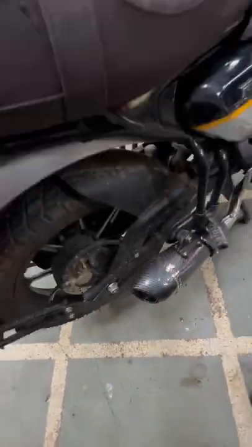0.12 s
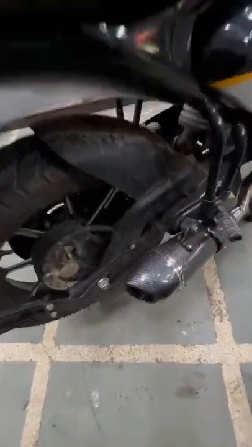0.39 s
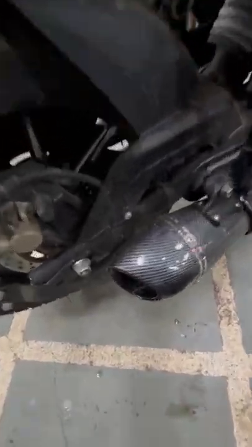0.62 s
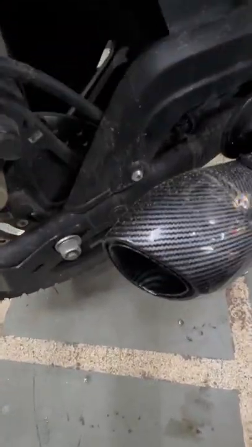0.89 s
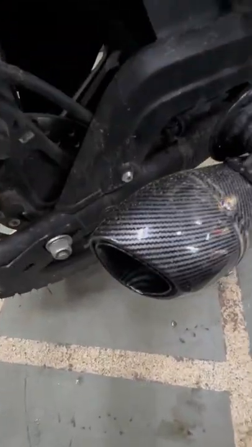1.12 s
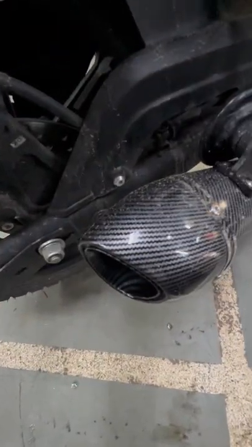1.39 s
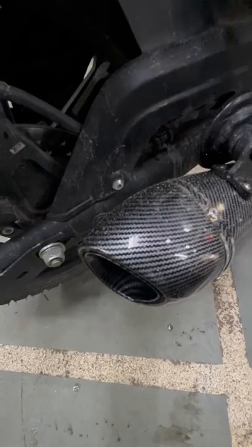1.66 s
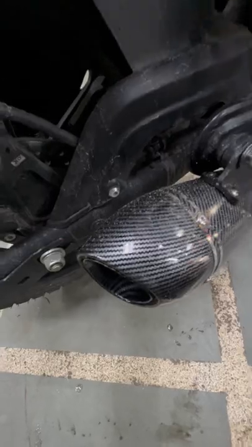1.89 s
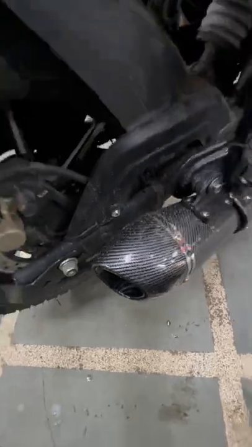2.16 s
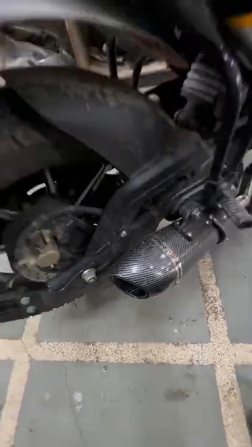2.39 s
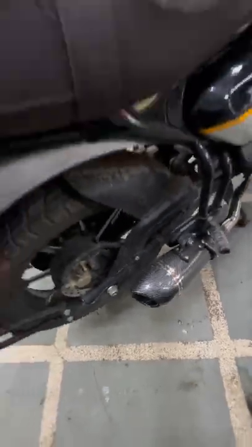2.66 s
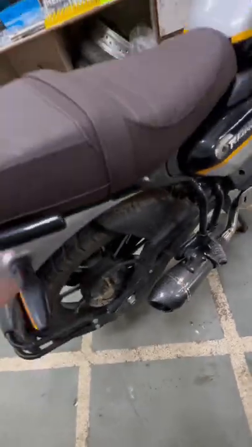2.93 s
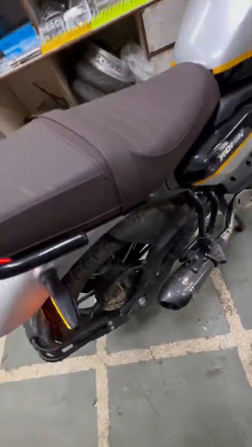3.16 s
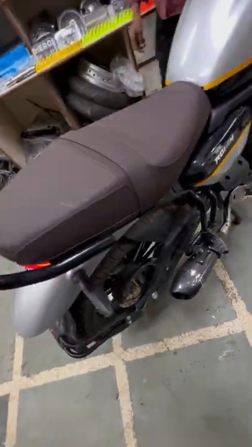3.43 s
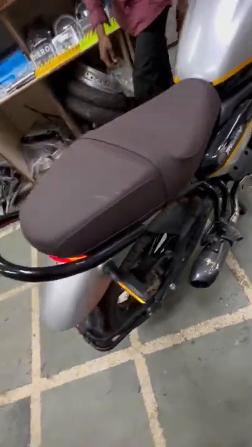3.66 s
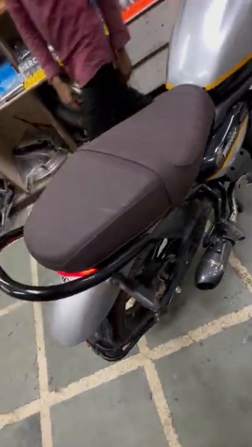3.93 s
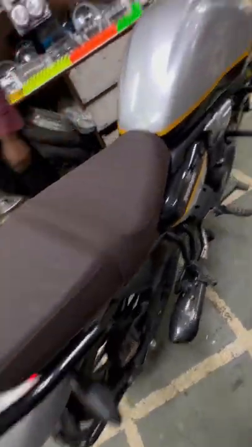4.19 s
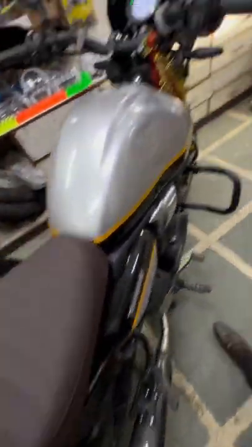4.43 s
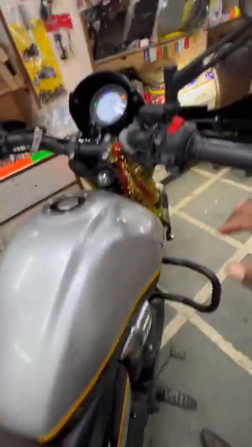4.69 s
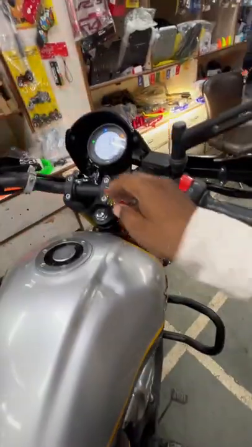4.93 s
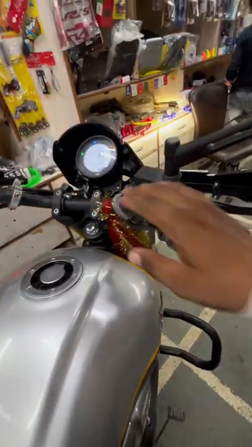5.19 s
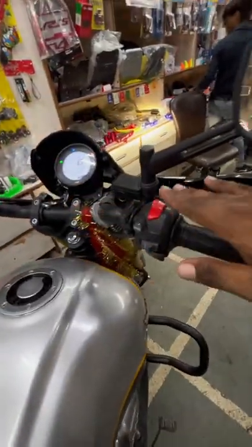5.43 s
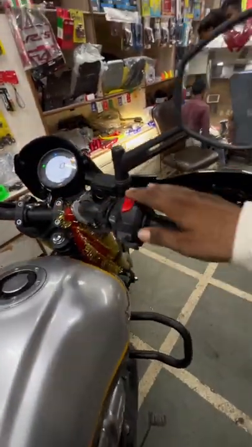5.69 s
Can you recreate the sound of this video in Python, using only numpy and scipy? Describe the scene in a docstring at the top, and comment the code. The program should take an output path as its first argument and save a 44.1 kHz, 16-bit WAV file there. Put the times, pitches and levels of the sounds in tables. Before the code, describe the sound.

A single-cylinder motorcycle is revved in a workshop, harsh barks and spits up close at the tailpipe, then settling to a soft, distant idle.

```python
"""Motorcycle blipped in a workshop

A single-cylinder motorcycle idles and is blipped; the microphone moves to the tailpipe and away.
Each firing spits a jet of gas and rings the exhaust: a thump that swells slowest, a boom and a bark.
Fuelled firings add a knock and a crack, made as a short low ring and a short burst of noise.
Rattle and valve clatter are shaped noise; the walls return the exhaust through sparse random taps."""
import sys
import numpy as np
from scipy import signal
from scipy.fft import rfft, irfft
from scipy.io import wavfile
from scipy.ndimage import uniform_filter1d

SR = 44100
rng = np.random.default_rng(int(sys.argv[2]) if len(sys.argv) > 2 else 0)


def store_pcm(level_fs):
    """Save levels as 16-bit WAV."""
    pcm = np.round(np.clip(level_fs, -1, 1) * 32767).astype(np.int16)
    wavfile.write(sys.argv[1], SR, np.atleast_2d(pcm).T)


def convert_level_to_amplitude(level_db):
    """Map a level in decibels to its linear amplitude factor."""
    exponent = np.asarray(level_db, float) / 20
    return 10 ** exponent


N = 256662

# engine speed: [t/s, firings per second]
SPEED = [(0.0, 48.79), (1.08, 15.43), (1.21, 22.44), (1.4, 19.71), (1.58, 25.58), (1.81, 18.6),
         (1.89, 20.4), (2.0, 16.31), (2.29, 26.48), (2.37, 20.91), (2.69, 22.84), (2.79, 18.38),
         (3.09, 34.11), (3.49, 25.35), (3.77, 16.8), (3.94, 27.63), (4.22, 38.2), (4.42, 40.0), (4.7, 30.3),
         (5.22, 15.3), (5.82, 15.46)]
# what each place in the shop does to the sound: [t/s, ring length as a factor on t60, wall return/dB,
# tilt of the bark modes/dB per octave from 300 Hz, extra top of the jet/dB, valve tick/dB,
# knock over the bark/dB, softness as a factor on the rise of bark and spit]
PLACE = [(0, 0.36, -74, 17.5, -14, -74, -5.5, 1.4), (.5, 0.48, -19.5, 10.5, 5, -54, 17, 1.5),
         (1.2, 1.33, -19.5, 6.5, 8, -50.5, 7.5, 1.17), (1.8, 1.35, -17.5, 2, -1, -55.5, 1, 0.89),
         (2.6, 1.42, -74, 3, 9.5, -60.5, 1.5, 0.94), (3.7, 1.28, -11, 4.5, 15, -66, -4, 1.4),
         (4.2, 0.53, -8.5, 5, 6, -59, -2.5, 1), (4.8, 1.62, -23, 0, -27, -63, -20, 4.5),
         (5.8, 2.8, -22, -18, -22, -89, -3, 4.4)]
# slow low mode of the exhaust with cool gas, at 22 firings a second: [f/Hz, level/dB, t60/s, rise/ms]
THUMP = [(87.44, 0, 0.13, 8.1)]
# throttle blips: [opens/s, shuts/s, boom gain/dB, bark gain/dB, jet gain/dB]
BLIPS = [(1.14, 1.173, 2.5, 4, 18.5), (1.42, 1.532, 2, 0.5, 19), (1.88, 1.897, 8, 10, 22.5),
         (1.99, 2.09, 2, 0, 5), (2.09, 2.207, 5, 8, 21.5), (2.5, 2.557, 9.5, 9.5, 12.5),
         (2.82, 3.162, 0, 9, 12.5), (3.77, 4.367, 2, 10.5, 18.5)]


def evened(x):
    """Scales to an average strength (rms) of 1."""
    return x / np.sqrt(np.mean(x ** 2) + 1e-20)


def read(points, hz):
    """Reads a spectrum on a log-frequency axis."""
    f, value = np.transpose(points)
    return np.interp(np.log(hz + 1), np.log(f + 1), value)


def curve(rows, t):
    """Reads every column of a curve at times t."""
    s, *columns = np.transpose(rows)
    return np.array([np.interp(t, s, c) for c in columns])


def add(mix, s, sound):
    """Mixes a sound in at s seconds."""
    part = mix[..., int(s * SR):][..., :sound.shape[-1]]
    part += sound[..., :part.shape[-1]]


def noise(colour, likeness):
    """Two channels of coloured noise, partly alike: the right one mixes the left with a separate noise."""
    hz = np.fft.rfftfreq(N, 1 / SR)
    left, other = rfft(rng.standard_normal((2, N)))
    same = np.clip(read(likeness, hz), -1, 1)
    pair = np.array([left, same * left + np.sqrt(1 - same ** 2) * other])
    return evened(irfft(pair * convert_level_to_amplitude(read(colour, hz)), N))


def firing_times():
    """The engine fires at every whole number of the summed speed."""
    t = np.arange(N) / SR
    turns = np.cumsum(curve(SPEED, t)[0]) / SR
    return np.interp(np.arange(int(turns[-1]) + 1), turns, t)


def throttle(times):
    """1 while the throttle is open, fading as the gas cools after it shuts."""
    opens, shuts = np.transpose(BLIPS)[:2, :, None]
    fade = np.exp(-np.maximum(times - shuts, 0) / 0.076)
    return ((times > opens) * fade).max(0)


def octaves(t):
    """Engine speed in doublings over 22 firings a second."""
    return np.log2(curve(SPEED, t)[0] / 22)


def levels(times):
    """Thump, boom, bark and jet dB of every firing, from place, speed, throttle and odd pops or stumbles."""
    # ring of an unfuelled stroke at 22 firings a second, as the microphone moves:
    # [t/s, thump/dB, boom/dB, bark/dB]
    stroke_levels = [(0, -22, -18.5, -30.5), (.15, -26.5, -21, -30), (.42, -21, -18, -31.5),
                     (.71, -11.5, -14.5, -26), (1.0, -11, -16.5, -25), (1.3, -12.5, -19.5, -25.5),
                     (1.6, -12.5, -18.5, -21.5), (1.85, -16, -21.5, -32), (2.2, -16, -22, -26.5),
                     (2.45, -23, -26.5, -34), (3.2, -30.5, -24.5, -34.5), (3.65, -26.5, -27.5, -37.5),
                     (4.06, -30.5, -26, -38.5), (4.42, -29.5, -25, -39), (4.9, -30, -31.5, -37.5),
                     (5.2, -34, -37.5, -40.5), (5.35, -37.5, -30, -35.5), (5.6, -33.5, -24, -29.5)]
    # faster strokes ring louder, dB per doubling of speed: [thump, boom, bark]
    speed_gains = [8, 6.5, 5.5]
    # single firings that pop or stumble: [t/s, ring gain/dB, jet gain/dB]
    odd_firings = [(.084, -54, -29), (.715, -2.5, 6.5), (1.155, -1, 8.5), (1.201, 4, 15), (1.44, 7, -4.5),
                   (1.486, 5.5, -1), (1.57, -11, -3.5), (2.464, -15, -33), (2.51, 2, 15.5), (2.556, 5.5, 7),
                   (3.151, -33, -26), (3.785, 1, 11), (3.837, -1, 10), (4.356, -5.5, -20),
                   (5.271, -12, -17), (5.726, -6, 4)]

    thump, boom, bark = curve(stroke_levels, times) + np.outer(speed_gains, octaves(times))
    opens, shuts, *gains = np.transpose(BLIPS)
    is_open = (times > opens[:, None]) & (times <= shuts[:, None])
    boom_up, bark_up, jet_up = gains @ is_open
    at, *gains = np.transpose(odd_firings)
    ring_odd, jet_odd = gains @ (abs(times - at[:, None]) < .008)

    # before blips and odd firings, the jet is at -45 dB for a bark of -30 dB and grows more steeply
    spit = -45 + 1.497 * (bark + 30) + jet_up + jet_odd
    thump = thump + 0.33 * boom_up  # the thump takes a third of a boom gain
    return thump, boom + boom_up + ring_odd / 2, bark + bark_up + ring_odd, spit


def ports(s, share):
    """Left and right gain of one firing; a few are heard strong on the left and hollow on the right."""
    # lopsided firings: [t/s, left-right difference as a share of the bark]
    lopsided = [(1.154, 0.34), (1.202, 0.59), (2.161, 1.3), (2.205, 1.45)]
    side = share * sum(v for at, v in lopsided if abs(at - s) < .015)
    return np.array([[1 + side], [1 - side]])


def ring(modes, tune, length, tilt_db, chance, glide, glide_ms, soft=1):
    """Modes swell and die; the hot front travels faster, so pitch starts high and sags."""
    upper_limit = 0.66  # modes above the first ring no longer than this factor on t60
    t = np.arange(SR // 4) / SR
    warped = t + glide * glide_ms / 1000 * (1 - np.exp(-1000 * t / glide_ms))
    total, sound = 0, 0
    for k, (hz, db, t60, rise_ms) in enumerate(modes):
        level_db = db + tilt_db * abs(np.log2(hz / 300))
        mode_length = min(length, upper_limit) if k else length
        decay = convert_level_to_amplitude(level_db - 60 * t / (t60 * mode_length))
        swell = (1 - np.exp(-1000 * t / (rise_ms * soft))) ** 2 * decay
        total = total + swell ** 2 / 2
        # only the first mode is retuned; each firing also strays a little in pitch and level
        pitch = hz * (1 if k else tune) * (1 + .012 * chance[k, 0])
        wave = swell * np.sin(2 * np.pi * pitch * warped)
        sound = sound + (-1) ** k * convert_level_to_amplitude(2 * chance[k, 1]) * wave
    return sound / np.sqrt(total[:SR // 50].mean())  # evened over the first 20 ms


def exhaust(times):
    """Firings ring pipe and can: hot gas raises the lowest modes, shortens all; a shut throttle dulls them."""
    # exhaust modes with cool gas, for the can, the pipe, and a short low knock that only a fuelled
    # firing gives: [f/Hz, level/dB, t60/s, rise/ms]
    boom_modes = [(161.2, 0, 0.14, 2.2)]
    bark_modes = [(281, 21, 0.091, 0.8), (470.4, -0.5, 0.15, 0.47), (586.6, 1, 0.13, 1.42),
                  (858.6, -3, 0.091, 1.45), (1240, -9.5, 0.051, 0.8), (1569, -18.5, 0.043, 1.5),
                  (2090, -36.5, 0.094, 0.4)]
    punch_modes = [(197, 0, 0.038, 2.6)]
    boom_heat = 0.53  # the big can warms less than the pipe: power on the pitch rise
    flutter_db = 2.9  # rms up to 22 firings a second

    out = np.zeros((2, N))
    chance = rng.standard_normal((len(times), 3, len(bark_modes), 2))
    ring_levels = levels(times)[:3]
    place = curve(PLACE, times)[[0, 2, 5, 6]]
    columns = *ring_levels, *place, *curve(SPEED, times), throttle(times)
    for (s, thump_db, boom_db, bark_db, length, tilt_db, punch_db, soft,
         speed, gas, luck) in zip(times, *columns, chance):
        luck = luck * min(.9, (18 / speed) ** 1.5)  # fast firings are more alike
        stroke = (speed / 22) ** 0.34  # a faster exhaust stroke pushes a shorter thump
        heat = 1 + 0.11 * gas
        length = length * (1 - 0.47 * gas)

        thump = ring(THUMP, stroke, length, 0, luck[0], glide=0.25, glide_ms=8.4)
        boom = ring(boom_modes, heat ** boom_heat, length, 0, luck[1], glide=1.0, glide_ms=0.79)
        low = convert_level_to_amplitude(thump_db) * thump + convert_level_to_amplitude(boom_db) * boom
        add(out, s + 0.00028, ports(s, 0.46) * low)

        dulled_db = tilt_db - 7 * (1 - gas)
        bark = -ring(bark_modes, heat, length, dulled_db, luck[2], glide=0.89, glide_ms=1.49, soft=soft)
        punch = ring(punch_modes, 0.96, 1, 0, luck[1], glide=1.16, glide_ms=3.49)
        add(out, s + 0.0019, gas ** 2 * convert_level_to_amplitude(bark_db + punch_db) * ports(s, 0.46) * punch)
        add(out, s + 0.00049, convert_level_to_amplitude(bark_db) * ports(s, 1.0) * bark)
        # second knock, back from the far end of the pipe
        add(out, s + .0125 / heat, convert_level_to_amplitude(bark_db - 17.0) * ports(s, 1.0) * bark)

    # turbulence makes the ring flutter; fast running is steadier
    calm = np.minimum(1, 2 ** (-2 * octaves(np.arange(N) / SR)))
    wander = uniform_filter1d(uniform_filter1d(rng.standard_normal(N), size=400), size=400)
    return out * convert_level_to_amplitude(flutter_db * calm * evened(wander))


def jet(times):
    """A spit of gas at each firing, then weaker puffs as the gas column sloshes in the pipe."""
    # colour of the hiss: [f/Hz, level/dB per Hz]
    jet_colour = [(600, 16), (1600, 4), (3200, 1), (5000, -2), (8000, 1.5), (10300, -9.5), (12500, -4.5),
                  (15800, -13)]
    # left-right likeness of the hiss: [f/Hz, likeness]
    jet_same = [(2000, 0.99), (6000, 0.33), (10000, 0.89)]
    lazy_rise_s = 0.0017  # an unfuelled stroke puffs out more slowly
    jet_side = 2  # share of the left-right difference that the jet takes
    jet_top_hz, side_top_hz = 11150, 2800  # start of the extra top; a lopsided jet differs mainly below

    t, gate = np.arange(SR // 10) / SR, np.zeros((2, N))
    slosh = (.5 + .5 * np.cos(2 * np.pi * THUMP[0][0] * t)) ** 2
    columns = levels(times)[3], throttle(times), curve(PLACE, times)[6]
    for s, db, gas, soft, luck in zip(times, *columns, rng.standard_normal((len(times), 2))):
        rise = np.clip(t / (.0006 * soft + lazy_rise_s * (1 - gas)), 0, 1)
        spit = rise * np.exp(-(t / (.008 - .0045 * gas)) ** 1.5)
        puffs = convert_level_to_amplitude(-1 - 12 * gas + luck[0] - 60 * t / .1) * (.4 + slosh) * np.clip(t / .003, 0, 1)
        side = ports(s, jet_side)[0, 0] - 1
        # gate rows: both sides alike, and the left-right difference
        add(gate, max(s - .0007, 0), convert_level_to_amplitude(db + 1.2 * luck[1]) * np.array([[1], [side]]) * (spit + puffs))

    crackle = convert_level_to_amplitude(2.0 * evened(uniform_filter1d(rng.standard_normal(N), size=30)))  # turbulent flicker
    hiss = noise(jet_colour, jet_same)
    top = signal.sosfiltfilt(signal.butter(4, jet_top_hz, "high", fs=SR, output="sos"), hiss)
    low_pass = 1 / (1 + (np.fft.rfftfreq(N, 1 / SR) / side_top_hz) ** 4)
    turned = irfft(1j * rfft(hiss.mean(0)) * low_pass, N)  # a quarter cycle off
    top_db = curve(PLACE, np.arange(N) / SR)[3]
    both = (hiss + convert_level_to_amplitude(top_db) * top) * gate[0]
    return (both + np.outer([1, -1], turned * gate[1])) * evened(crackle)


def rattle():
    """Mechanical noise that grows with speed and throbs with each cycle, with a rough flicker."""
    # rattle of the running gear at 22 firings a second: [t/s, level/dB]
    rattle_levels = [(0, -47), (4.7, -51.5), (5.8, -46.5)]
    # colour of the rattle: [f/Hz, level/dB per Hz]
    rattle_colour = [(300, -5), (520, 1), (800, -9.5), (2000, -20.5), (5000, -28), (8500, -27.5),
                     (16000, -41)]
    # left-right likeness of the rattle: [f/Hz, likeness]
    rattle_same = [(500, 0.71), (2000, 0.99), (5000, 0.074), (12000, 0.59)]

    t = np.arange(N) / SR
    flicker = evened(uniform_filter1d(rng.standard_normal(N), size=400))
    throb = np.cos(2 * np.pi * (np.cumsum(curve(SPEED, t)[0]) / SR - 0.25))
    # 12.5 dB per doubling of speed, and 1.5 dB up and down within a cycle
    db = curve(rattle_levels, t)[0] + 12.5 * octaves(t) + 1.5 * throb
    return noise(rattle_colour, rattle_same) * convert_level_to_amplitude(db + 2 * flicker)


def valves(times):
    """A valve seats once a cycle: a short clatter through the resonances of the cover."""
    # valve cover resonances: [f/Hz, width/Hz, level/dB]
    cover_modes = [(3220, 760, 0)]
    lag, peak_s = 0.18, 0.006  # mean share of a cycle after the firing; rise to the loudest point

    gate, t = np.zeros(N), np.arange(SR // 20) / SR
    clatter = t / peak_s * np.exp(1 - t / peak_s)
    columns = curve(PLACE, times)[4], *curve(SPEED, times)
    for s, db, speed, (late, size) in zip(times, *columns, rng.standard_normal((len(times), 2))):
        add(gate, s + (lag + .06 * late) / speed, convert_level_to_amplitude(db + 3 * size) * clatter)
    hz = np.fft.rfftfreq(N, 1 / SR)
    cover = sum(convert_level_to_amplitude(db) / (1 + (2 * (hz - centre_hz) / width_hz) ** 2)
                for centre_hz, width_hz, db in cover_modes)
    a, b = rng.standard_normal((2, N))
    pair = np.array([a + 0.14 * b, a - 0.5 * b])  # left and right partly alike
    return gate * evened(irfft(rfft(pair) * cover, N))


def shop(x):
    """Walls as sparse taps of random sign, one in every 20 samples, each band dying at its own speed."""
    # how long the shop rings: [f/Hz, t60/s]
    shop_decay = [(100, 0.015), (1000, 1), (8000, 0.24)]
    taps = np.zeros((2, SR // 2))
    at = np.arange(250, SR // 2 - 20, 20)
    at = at + rng.integers(0, 20, (2, len(at)))
    np.put_along_axis(taps, at, rng.choice([-1., 1.], at.shape), 1)
    hz, t, z = signal.stft(taps, SR, nperseg=512)
    fade = convert_level_to_amplitude(-60 * t / read(shop_decay, hz)[:, None])
    tail = signal.istft(z * fade, SR, nperseg=512)[1]
    return signal.fftconvolve(x[None], tail / np.linalg.norm(tail[0]), axes=1)[:, :N]


def crack(times):
    """The blast of a fuelled firing leaves the pipe as a short burst of middle frequencies."""
    crack_db, peak_s = -25.5, 0.0016  # level over the bark; rise to the loudest point
    backfire_s, backfire_db = 1.486, 18  # one firing cracks much harder

    gate, t = np.zeros(N), np.arange(SR // 40) / SR
    burst = t / peak_s * np.exp(1 - t / peak_s)
    for s, db, gas in zip(times, levels(times)[2], throttle(times)):
        extra_db = backfire_db * (abs(s - backfire_s) < 1 / 50)
        add(gate, s, gas ** 2 * convert_level_to_amplitude(db + crack_db + extra_db) * burst)
    band = signal.butter(2, [690, 4100], "band", fs=SR, output="sos")
    return gate * evened(signal.sosfilt(band, rng.standard_normal(N)))


def scene():
    """Engine layers heard directly, and the exhaust, jet and crack heard again from the walls."""
    times = firing_times()
    direct = exhaust(times) + jet(times) + crack(times)
    wall_db = curve(PLACE, np.arange(N) / SR)[1]
    return direct + rattle() + valves(times) + shop(direct.mean(0) * convert_level_to_amplitude(wall_db))


def top_cut(x):
    """Nothing passes above the cut-off."""
    return signal.sosfilt(signal.butter(12, 16800, fs=SR, output="sos"), x)


def record(dry):
    """Two microphone ports a little apart shift the phase; then a bass cut and a soft ceiling."""
    # phase between the ports: [f/Hz, radians by which left leads (negative: right leads)]
    port_lead = [(2000, -.05), (6000, -.7), (9000, -1.5)]
    lead = np.exp(.5j * read(port_lead, np.fft.rfftfreq(N, 1 / SR)))
    pair = irfft(rfft(dry) * np.array([lead, 1 / lead]), N)
    pair = signal.sosfilt(signal.butter(4, 47, "high", fs=SR, output="sos"), pair)
    pair = .97 * pair / (1 + abs(pair / .97) ** 4) ** .25
    return top_cut(pair)


dry = scene()
out = record(dry)
store_pcm(out)
```